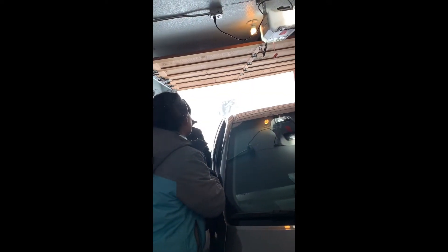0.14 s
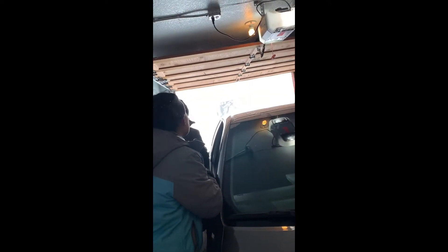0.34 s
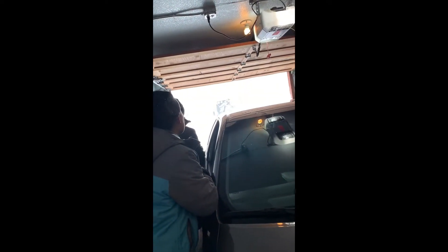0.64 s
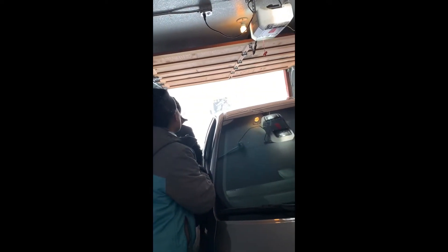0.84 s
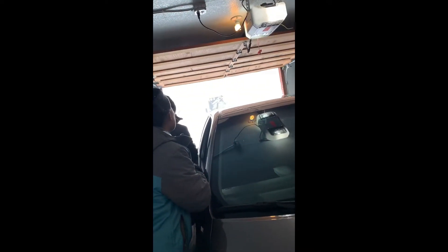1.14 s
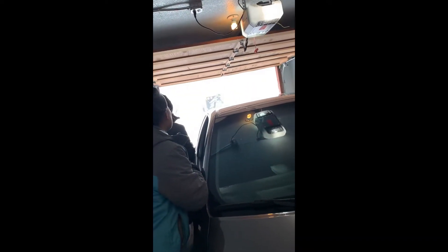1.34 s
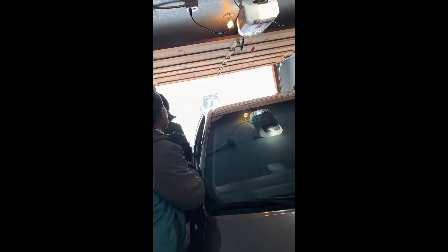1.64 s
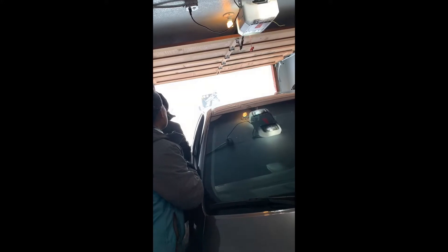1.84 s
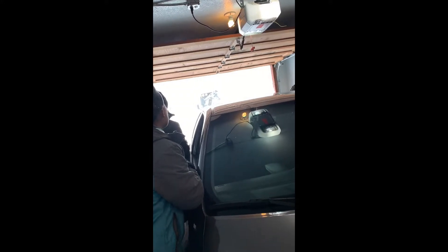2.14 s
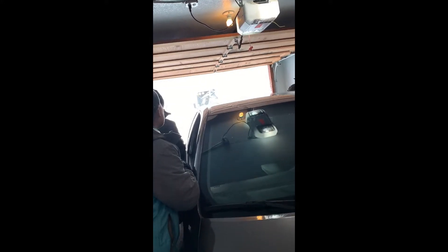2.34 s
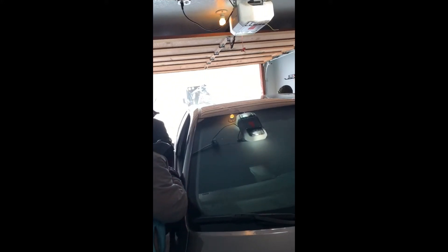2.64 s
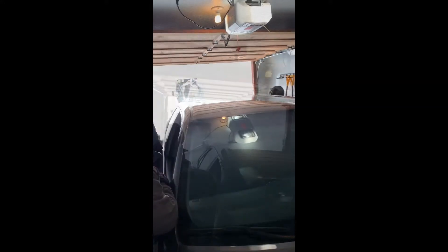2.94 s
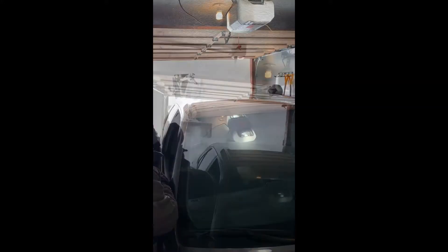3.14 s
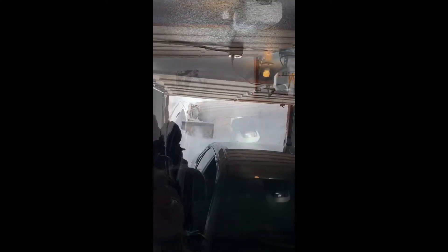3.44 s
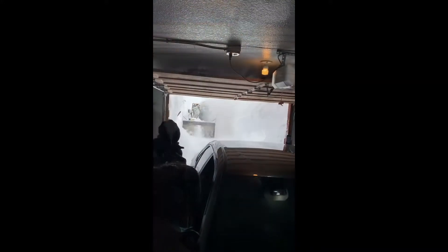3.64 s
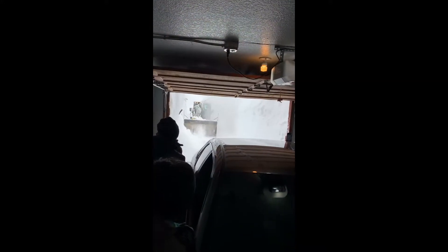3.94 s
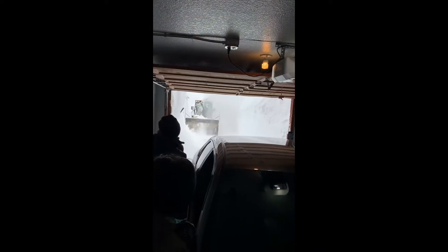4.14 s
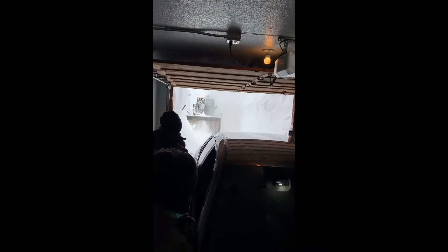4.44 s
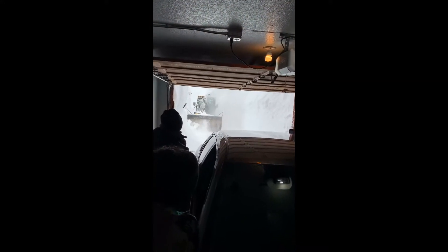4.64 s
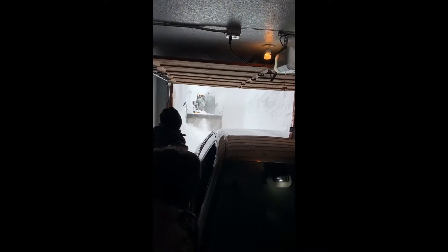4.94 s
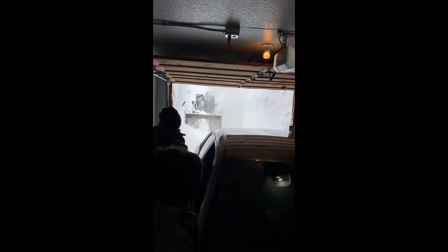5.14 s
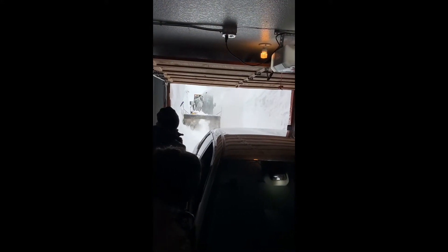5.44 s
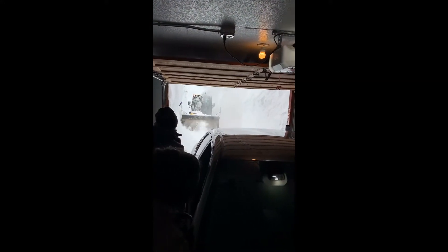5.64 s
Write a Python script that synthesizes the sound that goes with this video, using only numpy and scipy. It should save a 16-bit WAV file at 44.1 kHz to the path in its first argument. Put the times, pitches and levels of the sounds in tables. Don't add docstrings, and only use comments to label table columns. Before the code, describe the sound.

A petrol snowblower works just outside a garage, heard from inside on a handheld phone in stereo. From 0 to about 2.8 s it is near and fast: a dense, wavering low hum, throbbing nearly six times a second as the auger bites, under a coarse roar, puffing snow hiss, a mid-low gear whine and hollow pipe-like tones. Loose parts chatter on sheet metal in uneven bright bursts, busiest around 0.7-2 s, with small knocks at 0.8, 1.2-1.5 and a duller one near 2.05 s. The lower rattle then thins, leaving high ticking. Between 2.8 and 3.7 s it crossfades to a slower, farther engine: a dull, fluttering low putter, with softened roar and hiss. A heavy low thud lands near 4.05 s; ice knocks and cracks hollowly at 4.4, 4.6 and 4.75-5.05 s, with faint ticks at 5.4 and 5.75 s. The engine pushes harder from about 5.5 s and continues to the end.

```python
import sys
import numpy as np
from scipy import signal
from scipy.fft import rfft, irfft, next_fast_len
from scipy.io import wavfile
from scipy.ndimage import uniform_filter1d

SR = 44100
rng = np.random.default_rng(int(sys.argv[2]) if len(sys.argv) > 2 else 0)


def makeup_ratio(level_db):
    decades = np.asarray(level_db, float) / 20
    return 10 ** decades


def dump_mix(stems):
    frames = np.atleast_2d(stems).T
    limited = np.clip(frames, -1, 1)
    pcm = np.round(limited * 32767).astype(np.int16)
    wavfile.write(sys.argv[1], SR, pcm)


N = 255780
T = np.arange(N) / SR

FADE_S = (2.76, 3.675)

# time in seconds, shaft speed in Hz.
SHAFT_SPEED = [(0, 46.1), (.35, 45.95), (.65, 46.6), (.9, 46.4), (1.15, 46.3), (1.25, 45.35), (1.55, 44.6),
               (1.66, 45.9), (1.84, 46.55), (2.12, 45.4), (2.4, 46.0), (2.75, 46.85), (2.99, 46.2),
               (3.45, 46.75)]
# time in seconds, load in dB.
SNOW_LOAD = [(0, -5), (.45, -2), (.9, -2.5), (1.3, -2), (1.5, -5), (1.65, -3), (1.9, -2), (2.15, 3),
             (2.55, 3.5), (2.85, 0), (3.1, 3), (3.5, 2)]
# multiple, level in dB, unsteadiness in dB.
SHAFT_ORDERS = [(3, -32, 3.5), (3.6, -33.5, 4.5), (7.1, -33, 0.5), (7.7, -33.5, 2), (8.3, -35.5, -2)]
# time in seconds, then levels in dB of the second, fourth and sixth multiple of the shaft speed.
DOORWAY = [(0, -32, -30, -22), (.3, -25.5, -29, -25), (.75, -20, -24.5, -22.5), (1.0, -24, -24.5, -21.5),
           (1.3, -20, -20.5, -22), (1.501, -26.5, -19.5, -28), (1.75, -20, -24, -19.5),
           (2.1, -25, -20, -25.5), (2.5, -20, -24.5, -28), (2.9, -36, -20.5, -24), (3.3, -31, -32, -35)]
# multiple, level in dB, unsteadiness in dB.
AUGER_ORDERS = [(5, -44, 2), (6, -33, 3), (7, -23.5, 1.1), (10, -39, 3), (11, -40, 3), (12, -40, 3),
                (13.3, -33, 3), (14, -31, 3), (18, -40, 3)]
AUGER_GEARING, AUGER_START = 8, -0.014
BITE_AT, BITE_DEPTH = 0.66, 0.95
# time in seconds, whine level in dB.
GEAR_PRESSURE = [(0, -31), (.3, -42.5), (.6, -33), (.85, -37), (1.12, -30), (1.27, -44), (1.5, -31),
                 (1.66, -42), (1.85, -29), (2.05, -38), (2.35, -36), (2.55, -32), (2.75, -28), (3.0, -35),
                 (3.5, -27.5)]
# frequency in Hz, level in dB.
ROAR_NEAR = [(25, -10), (55, -5), (95, -2), (150, -12), (205, -4), (255, -7), (330, -8.5), (430, -18),
             (550, -20.5), (750, -18), (1130, -23.5), (1450, -22), (2100, -30), (4000, -36.5)]
# frequency in Hz, level in dB.
HISS = [(1200, -26.5), (2300, 0), (3800, -6), (5000, -2), (7000, -10.5), (8300, -15), (9200, -13),
        (10100, -19.5), (16000, -9)]
# frequency in Hz, width in Hz, level in dB, middle in seconds, half length in seconds.
PIPES = [(746.5, 9.9, -3, 0.53, 0.82), (743, 14, -2, 1.1, 0.082), (742, 14, -3, 2.11, 0.31),
         (734, 31, -4, 2.7, .2), (638, 23, -8, 1.25, 0.23), (628, 11, -5, 2.8, 0.67),
         (640, 12, -9, 3.1, .2), (674, 12, -9, 0.17, 0.46), (877, 14, -8.5, 0.25, 0.79),
         (870.3, 4.4, -8.5, 2.07, 1), (818, 18, -5.5, 3.2, 0.89), (992, 25, -12.5, 2.5, 0.65)]

# frequency in Hz, time to fall by 60 dB in seconds, level in dB, number of the loose part that hits it.
SHEET_METAL = [(1459, .06, 3, 3), (1313, .05, 0, 3), (2842, .07, -7, 0), (1720, .04, -3, 3),
               (3639, .08, 5.5, 0), (3720, .04, -5, 0), (4080, .04, -7, 1), (4200, .04, -7, 1),
               (5001, .08, -6, 0), (5880, .07, -9, 1), (6557, .08, -9, 1), (6767, .12, 0, 1),
               (7500, .05, -6, 1), (8258, .1, -4, 2), (8414, .09, -3.5, 2), (10142, .07, 1.5, 4),
               (11050, .09, -17, 2), (12000, .12, -12, 2)]
# time in seconds, peak in dB.
JOLTS_LOW = [(.38, -57), (.6, -49), (.8, -40), (.9, -55), (.98, -44), (1.09, -35.5), (1.13, -51),
             (1.22, -54), (1.34, -43), (1.45, -40), (1.49, -38), (1.535, -39), (1.6, -51), (1.67, -41),
             (1.74, -44.5), (1.84, -50), (1.92, -45), (1.97, -43), (2.065, -47), (2.15, -57), (2.44, -55)]
# time in seconds, peak in dB.
JOLTS_MID = [(.26, -47), (.44, -39), (.73, -39.5), (.99, -38), (1.08, -31.5), (1.33, -39.5), (1.55, -44),
             (1.73, -41), (1.92, -41), (2.16, -46), (2.27, -57)]
# time in seconds, peak in dB.
JOLTS_HIGH = [(.27, -41), (.44, -50), (.71, -52), (.82, -38), (.985, -41), (1.13, -37), (1.17, -50),
              (1.345, -35), (1.385, -35), (1.54, -39), (1.74, -51), (1.94, -52), (2.01, -48), (2.075, -50),
              (2.14, -42), (2.275, -42), (2.325, -43), (2.37, -42), (2.47, -42), (2.56, -44), (2.6, -47),
              (2.655, -42), (2.695, -45), (2.73, -46), (2.78, -40), (2.86, -43), (3.03, -40), (3.14, -42),
              (3.26, -42), (3.395, -44)]
# time in seconds, peak in dB.
JOLTS_PANEL = [(.45, -44), (.79, -45), (1.07, -40), (1.22, -39), (1.34, -41), (1.53, -38), (1.91, -41),
               (2.02, -42), (2.53, -41), (2.61, -42.5), (2.822, -47), (2.97, -63)]
# time in seconds, peak in dB.
JOLTS_TOP = [(.27, -44), (.45, -42), (.73, -42), (.81, -51), (1.0, -48), (1.06, -44), (1.12, -41),
             (1.2, -47), (1.35, -40), (1.55, -47), (1.75, -51), (2.0, -51), (2.33, -40), (2.48, -39),
             (2.55, -46), (2.62, -45), (2.72, -44), (2.82, -38), (3.03, -39), (3.1, -41), (3.18, -40),
             (3.401, -37.5)]
IDLE_CHATTER_DB = (-55, -53, -50, -51, -52)
TURNED_AWAY_DB = (-9, -5, 0, 0, 0)
SWING_S = (2.05, 2.2)
JOLT_RISE_S, JOLT_FALL_S = 0.02, 0.03

# middle in
# seconds, frequency in Hz, peak in dB, half length in seconds.
SINGING_TONES = [(0.251, 86.6, -9.5, 0.028), (0.783, 85.5, -23, .05), (1.16, 1337, -30, 0.03),
                 (1.332, 1302, -30, 0.021), (1.55, 1473, -30, 0.037), (2.067, 1752, -30.5, 0.026),
                 (2.97, 1468, -30.5, 0.064), (3.199, 81, -18.5, 0.083), (4.115, 347, -23.5, 0.024),
                 (4.176, 1380, -32, 0.022), (4.22, 325, -20.5, 0.017), (4.373, 1240, -29, 0.028),
                 (4.388, 1752, -34, 0.039), (4.639, 1390, -26, 0.013), (4.717, 316, -22.5, 0.035),
                 (4.764, 382, -22, 0.014), (4.768, 1112, -23.5, .012), (4.782, 329, -21.5, 0.025),
                 (4.84, 311, -26, 0.019), (4.845, 1760, -28, 0.013), (4.93, 330, -26, 0.036),
                 (5.046, 335, -20.5, 0.027), (5.14, 330, -24, .03), (5.46, 342, -30, 0.03)]
# start in seconds, peak in dB, treble share in dB, length in seconds.
LUMPS = [(0.784, -23, -13, 0.027), (1.172, -25, -16, 0.019), (1.22, -25, -3, 0.0098),
         (1.317, -18.5, -10, 0.019), (1.527, -24, -6, 0.015), (2.055, -14, -30, 0.015),
         (2.363, -19.5, -7, 0.019), (2.448, -20.5, -3, 0.021), (2.694, -24, -6, 0.026),
         (2.801, -19.5, -2, 0.02), (3.155, -30, -25, 0.019), (4.02, -21, -14, 0.055),
         (4.072, -33, -17, 0.072), (4.317, -26, -2, 0.012), (4.365, -17, -12.5, 0.031),
         (4.533, -36, 3.5, 0.017), (4.627, -22, -7, 0.015), (4.753, -17, -13.5, 0.026),
         (4.832, -28, -35, 0.018), (4.902, -21, -6, 0.0098), (4.927, -36, 7, 0.016),
         (4.988, -28, -1.5, 0.029), (5.02, -36, 0, 0.046), (5.388, -37, 2, 0.023), (5.416, -38, -10, 0.028),
         (5.75, -35, -1, 0.036)]
# frequency in Hz, width in Hz, level in dB.
CHUTE = [(980, 120, -10), (1240, 110, -7), (1752, 56, 2.5), (2720, 88, -16)]
# time in seconds, level in dB.
CRACKS = [(2.061, -29), (4.053, -29), (4.071, -24), (4.367, -26), (4.378, -17), (4.387, -17), (4.395, -24),
          (4.404, -29), (4.629, -21), (4.639, -17), (4.662, -25), (4.759, -25), (4.7625, -22),
          (4.7665, -22), (4.797, -19)]
# frequency in Hz, width in Hz, level in dB.
CHUTE_WALL = [(360, 180, -4), (1110, 200, 3), (1750, 300, -11), (2900, 700, -7), (4600, 600, -11)]

# time in seconds, effort in dB.
FAR_EFFORT = [
    (3.45, -4),
    (3.75, -1),
    (4.05, -1),
    (4.5, 0.5),
    (4.85, 1),
    (5.2, -1.5),
    (5.5, 3.5),
    (5.8, 3),
]
# time in seconds, rate in Hz.
FIRING_RATE = [(3.0, 19.3), (4.1, 19.4), (4.5, 19.3), (4.85, 19.45), (5.25, 19.25), (5.8, 19.4)]
# multiple, level in dB, unsteadiness in dB.
FIRING_ORDERS = [(2.26, -29, 4.5), (3.43, -35, 3), (4.3, -41, 3), (4.6, -40, 3), (5.3, -28, 3),
                 (6.36, -53, 3), (8.02, -35, 3), (11.85, -34.5, -1), (12.45, -34, 5), (15.54, -40, 6),
                 (16.9, -39, -2.5), (17.6, -44, 3), (19.53, -34.5, 3), (24.5, -49, 3), (26.93, -37.5, 4.5)]
# frequency in Hz, level in dB.
ROAR_FAR = [(30, -2), (65, -1.5), (100, -1.5), (125, -13), (180, -11.5), (230, -10.5), (330, -5),
            (420, -14.5), (700, -12.5), (1000, -19.5), (1350, -18.5), (1700, -23), (2200, -29.5),
            (4000, -36)]
STEADY_HZ = 19.39
AIR_LOSS_DB_PER_KHZ = 1.9
THUD_S, THUD_LENGTH_S = 4.025, 0.078
# frequency in Hz, width in Hz, level in dB.
HOUSING = [(147.4, 23, -29), (204.6, 18, -16.5), (268.5, 51, -20.5), (304.4, 52, -27)]

# frequency in
# Hz, width in # Hz, depth in dB.
EARLY_NULLS = [(1130, 45, -8), (3250, 130, -9), (4650, 250, -3), (5420, 220, -9), (6100, 60, -6)]
# frequency in Hz, width in Hz, depth in dB.
LASTING_NULLS = [(205, 10, -8), (255, 10, -8), (5420, 300, -5.5), (10800, 300, -4), (12650, 250, -4)]
# frequency in Hz, lead in half turns.
PORT_LEAD = [(1700, 0), (2330, .6), (3300, .8), (4700, .8), (5150, 1), (5550, 1.03), (7500, 1.93),
             (9000, 2.05), (10800, 2.93), (12500, 3.05), (14000, 4)]
# frequency in Hz, share in dB.
PORT_ECHO = [(35, -50), (90, -25), (180, -18), (350, -12), (500, -4), (800, -2), (1450, -8), (2600, -5),
             (3800, -1), (4800, -3), (5380, -13), (6300, -4), (8200, -19), (9700, -4), (11300, -17),
             (12300, -13), (13200, -4), (14500, -16)]
# frequency in Hz, level in dB.
MICROPHONE = [(8, -40), (25, -12), (38, 0), (11500, -2.5), (13000, -13.5), (14000, -14.5), (15750, -16.5),
              (15900, -50)]


def evened(x):
    return x / np.sqrt(np.mean(x ** 2) + 1e-20)


def read(points, hz):
    f, value = np.transpose(points)
    return np.interp(np.log(hz + 1), np.log(f + 1), value)


def curves(rows):
    s, *columns = np.transpose(rows)
    return [np.interp(T, s, column) for column in columns]


def drift(hz):
    smoothing = [1, -2 * np.exp(-hz / 80), np.exp(-hz / 40)]
    slow = signal.lfilter([1], smoothing, rng.standard_normal(N // 100 + 500))[498:]
    return np.interp(np.arange(N) / 100, np.arange(len(slow)), evened(slow - slow.mean()))


def noise(spectrum, lo_hz, hi_hz, patchy_db, flicker_db):
    frames = N // 256 + 5
    patches = uniform_filter1d(rng.standard_normal((513, frames)), size=8, axis=0)
    patches = evened(uniform_filter1d(patches, size=12, axis=1))
    flicker = evened(uniform_filter1d(rng.standard_normal(frames), size=4))
    z = signal.stft(rng.standard_normal(N), nperseg=1024, noverlap=768)[2]
    z = z * makeup_ratio(patchy_db * patches + flicker_db * flicker)[:, :z.shape[1]]
    x = rfft(signal.istft(z, nperseg=1024, noverlap=768)[1][:N])
    hz = np.fft.rfftfreq(N, 1 / SR)
    x = x * makeup_ratio(read(spectrum, hz))
    band = (hz > lo_hz) & (hz < hi_hz)
    return irfft(x, N) * N / np.sqrt(2 * np.sum(abs(x[band]) ** 2))


def ring(x, hz, width):
    r, w = np.exp(-np.pi * width / SR), 2 * np.pi * hz / SR
    return signal.lfilter([np.sin(w)], [1, -2 * r * np.cos(w), r * r], x)


def noise_ring(grit, hz, width):
    return ring(grit, hz, width) * np.sqrt(4 * np.pi * width / SR)


def passing(middle_s, half_s):
    return np.exp(-((T - middle_s) / half_s) ** 2)


def orders(table, turns, start, wobble):
    out = np.zeros(N)
    for (k, db, unsteady_db), phase in zip(table, start):
        unsteady_db = np.clip(unsteady_db, 0.5, 3)
        waver = wobble * unsteady_db * drift(6.2)
        level = np.sqrt(2) * makeup_ratio(db + unsteady_db * drift(15.4))
        out += level * np.cos(2 * np.pi * k * turns + phase + waver)
    return out


def puffing(turns, depth):
    return evened(1 + depth * np.exp(-(turns % 1) / 0.19))


def shaft_hum(turns, load):
    crank = makeup_ratio(-22 + 1.5 * drift(6.0)) * np.cos(2 * np.pi * (turns + 0.1) + 0.15 * drift(4.0))
    start = rng.uniform(0, 2 * np.pi, len(SHAFT_ORDERS))
    hum = crank + makeup_ratio(-0.25 * load + 0.6) * orders(SHAFT_ORDERS, turns, start, wobble=0.08)
    fifth_level = makeup_ratio(-25.5 + 1.44 * load + 1.06 * drift(2.5))
    hum += fifth_level * np.cos(2 * np.pi * 5 * turns + 0.68 * drift(1.03))
    for k, door_db in zip((2, 4, 6), curves(DOORWAY)):
        level = makeup_ratio(door_db + 1.34 * drift(8.6))
        if k == 2:
            level = level * (1 + BITE_DEPTH * np.cos(2 * np.pi * (turns / AUGER_GEARING - BITE_AT)))
        hum += level * np.cos(2 * np.pi * k * turns + 0.36 * drift(1.8))
    return hum


def auger_beat(auger_turns):
    start = rng.uniform(0, 2 * np.pi, len(AUGER_ORDERS))
    start = start * (np.transpose(AUGER_ORDERS)[0] != 7)
    return orders(AUGER_ORDERS, auger_turns, start, wobble=0.12)


def gear_whine(turns):
    whine_db, = curves(GEAR_PRESSURE)
    level = makeup_ratio(whine_db + 4.0 + 0.57 * drift(9.5))
    return level * np.sin(2 * np.pi * 10.8 * turns + 0.99 * drift(2.04))


def near_roar(turns, auger_turns, roar_db):
    bite_db = np.cos(2 * np.pi * (auger_turns - BITE_AT))
    roar = noise(ROAR_NEAR, 480, 1700, patchy_db=-1.5, flicker_db=-0.46)
    return makeup_ratio(roar_db + bite_db + 0.18) * roar * puffing(turns / 2, depth=0.07)


def near_hiss(turns, load):
    hiss_db = -35 + 0.57 * load + 1.8 * drift(19.0)
    hiss = noise(HISS, 2580, 9500, patchy_db=2.5, flicker_db=1.2)
    return makeup_ratio(hiss_db + 3.5) * hiss * puffing(turns / 2, depth=1.0)


def chatter(jolts, idle_db):
    t = T[::50]
    power = makeup_ratio(idle_db + 0.39 * drift(6.2))[::50] ** 2
    for s, db in jolts:
        distance = np.maximum((s - t) / JOLT_RISE_S, (t - s) / JOLT_FALL_S)
        power = power + makeup_ratio(db) ** 2 * np.exp(-2 * distance)
    return np.interp(T, t, 10 * np.log10(power))


def rattle():
    parts = (JOLTS_LOW, JOLTS_MID, JOLTS_HIGH, JOLTS_PANEL, JOLTS_TOP)
    turned = np.interp(T, SWING_S, (0, 1))
    taps = []
    for jolts, idle_db, hidden_db in zip(parts, IDLE_CHATTER_DB, TURNED_AWAY_DB):
        part_db = chatter(jolts, idle_db + hidden_db * turned)
        size = makeup_ratio(2.5 * np.minimum(rng.exponential(1, N), 3))
        happens = rng.random(N) < 500 / SR
        size = size * happens * rng.choice([-1, 1], N)
        taps.append(evened(size) * makeup_ratio(part_db + 1.5 + 0.037 * (part_db + 52.0)))
    out = np.zeros(N)
    for hz, t60, db, part in SHEET_METAL:
        out += makeup_ratio(db) * ring(taps[int(part)], hz, 1.45 / t60) * np.sqrt(4 * np.pi * 2.54 / t60 / SR)
    return out


def pipes(level):
    grit = level * rng.standard_normal(N)
    return sum(makeup_ratio(db) * passing(s, half) * noise_ring(grit, hz, width) for hz, width, db, s, half in PIPES)


def near():
    (shaft_hz,), (load,) = curves(SHAFT_SPEED), curves(SNOW_LOAD)
    turns = np.cumsum(shaft_hz) / SR
    auger_turns = turns / AUGER_GEARING + AUGER_START
    roar_db = -29 + 0.032 * load + 0.38 * drift(9.2)
    tones = shaft_hum(turns, load) + auger_beat(auger_turns) + gear_whine(turns)
    air = near_roar(turns, auger_turns, roar_db) + near_hiss(turns, load) + pipes(makeup_ratio(roar_db + 2.0))
    return tones + air + rattle()


def singing():
    unsteady = 0.31 * drift(37.0)
    out = np.zeros(N)
    for s, hz, db, half in SINGING_TONES:
        out += makeup_ratio(db) * passing(s, half) * np.sin(2 * np.pi * hz * (T - s) + unsteady)
    return out


def shaken(modes, force):
    grit = rng.standard_normal(N)
    return sum(makeup_ratio(db) * noise_ring(force * grit, hz, width) for hz, width, db in modes)


def lumps():
    knock, spit = np.zeros((2, N))
    for s, db, treble_db, length in LUMPS:
        span = slice(int(s * SR), int(s * SR) + SR // 5)
        u = abs(T[span] - s) / length
        blow = makeup_ratio(db) * np.minimum(u * 4, 1) * np.exp(-(u / 1.15) ** 2)
        knock[span] += blow
        spit[span] += makeup_ratio(treble_db) * blow
    scrape_colour = [(300, -6), (900, 3), (1500, 5), (3000, 3.5), (5000, -1), (9000, -20)]  # (Hz, dB)
    scrape = noise(scrape_colour, 1070, 5000, patchy_db=0.6, flicker_db=1.5)
    fizz_colour = [(4500, -25), (6500, -7), (7600, -7), (8350, 0), (9200, -8), (10000, -3), (12000, -16)]
    fizz = noise(fizz_colour, 5500, 10500, patchy_db=3.0, flicker_db=1.5)
    return makeup_ratio(-16) * shaken(CHUTE, knock) + makeup_ratio(-7) * knock * scrape + makeup_ratio(-4.5) * spit * fizz


def cracks():
    s, db = np.transpose(CRACKS)
    push = np.zeros(N)
    push[(s * SR).astype(int)] = makeup_ratio(db)
    return sum(makeup_ratio(level_db) * ring(push, hz, width) for hz, width, level_db in CHUTE_WALL)


def far_hum(turns, effort):
    start = rng.uniform(0, 2 * np.pi, len(FIRING_ORDERS))
    hum = makeup_ratio(0.7 * (-5 + 1.5 * effort)) * orders(FIRING_ORDERS, turns, start, wobble=0.22)
    for k, db, unsteady_db, waver in ((4, -21, 1.6, 0.25), (5, -26, 3.2, 0.5)):
        phase = 2 * np.pi * (k * STEADY_HZ * T + rng.random()) + waver * drift(4.0)
        hum += makeup_ratio(db + unsteady_db * drift(7.0)) * np.cos(phase)
    return hum


def far():
    effort, = curves(FAR_EFFORT)
    turns = np.cumsum(*curves(FIRING_RATE)) / SR
    roar = noise(ROAR_FAR, 540, 1500, patchy_db=2.0, flicker_db=0.1) * puffing(turns, depth=0.31)
    dulled = [(hz, db - AIR_LOSS_DB_PER_KHZ * min(hz, 9000) / 1000) for hz, db in HISS]
    hiss = noise(dulled, 2480, 9900, patchy_db=3.0, flicker_db=2.5) * puffing(turns, depth=0.41)
    air = makeup_ratio(-30.5 + 0.32 * effort + 0.66) * roar + makeup_ratio(-43.5 + 0.094 * effort + 3.5) * hiss
    return far_hum(turns, effort) + air


def thud():
    u = np.maximum(T - THUD_S, 0) / THUD_LENGTH_S
    swell = u * np.exp(1 - u ** 2)
    out = np.zeros(N)
    for hz, width, db in HOUSING:
        waver = width * drift(28.0) / 40
        out += makeup_ratio(db) * swell * np.sin(2 * np.pi * (hz * T + rng.random()) + waver)
    return out


def cancelling(nulls, hz):
    return makeup_ratio(sum(db * np.exp(-((hz - null_hz) / width) ** 2) for null_hz, width, db in nulls))


def ports(x):
    size = next_fast_len(N + SR)
    hz = np.fft.rfftfreq(size, 1 / SR)
    share = np.clip(makeup_ratio(read(PORT_ECHO, hz)), 0, 1)
    dying = makeup_ratio(-60 * np.arange(SR // 4) / SR / 0.16)
    echo = rfft(rng.standard_normal((2, SR // 4)) * dying, size)
    echo = echo / uniform_filter1d(abs(echo), size=200)
    lead = 0.5 * np.pi * read(PORT_LEAD, hz)
    direct = np.sqrt(1 - share ** 2) * np.array([np.cos(lead), 1j * np.sin(lead)])
    path = direct - 0.62 * share * echo
    usual = abs(direct) ** 2 + (0.7 * share) ** 2
    both, apart = path * np.sqrt(usual / uniform_filter1d(abs(path) ** 2, size=150))
    heard = rfft(x, size) * cancelling(LASTING_NULLS, hz)
    return irfft(heard * np.array([both + apart, both - apart]), size)[:, :N]


def scene():
    fade = np.clip((T - FADE_S[0]) / (FADE_S[1] - FADE_S[0]), 0, 1)
    engine = np.cos(fade * np.pi / 2) * near() + np.sin(fade * np.pi / 2) * far()
    hz = np.fft.rfftfreq(N, 1 / SR)
    cancelled = irfft(rfft(engine) * cancelling(EARLY_NULLS, hz), N)
    engine = cancelled + np.interp(T, SWING_S, (0, 1)) * (engine - cancelled)
    return ports(engine + singing() + lumps() + cracks() + thud())


def band_limit(x):
    return signal.sosfilt(signal.butter(12, 15830, fs=SR, output="sos"), x)


def record(dry):
    hissing = dry + makeup_ratio(-59) * rng.standard_normal(dry.shape)
    colour = makeup_ratio(read(MICROPHONE, np.fft.rfftfreq(N, 1 / SR)))
    mix = irfft(rfft(hissing) * colour, N)
    return band_limit(mix)


dry = scene()
out = record(dry)
dump_mix(out)
```